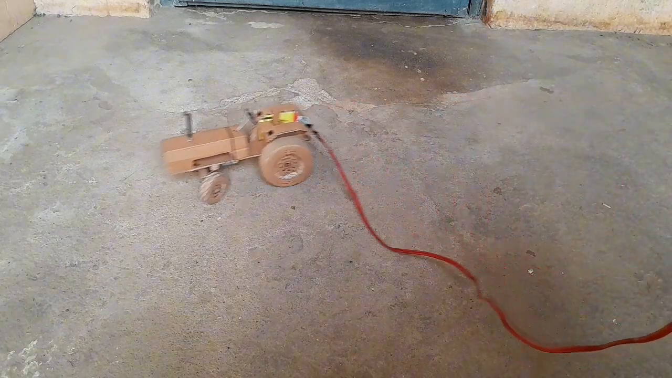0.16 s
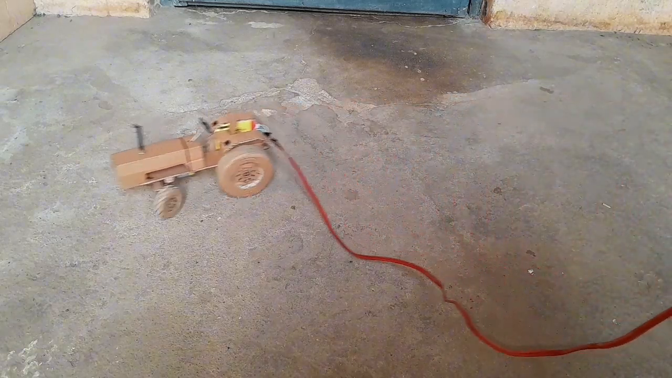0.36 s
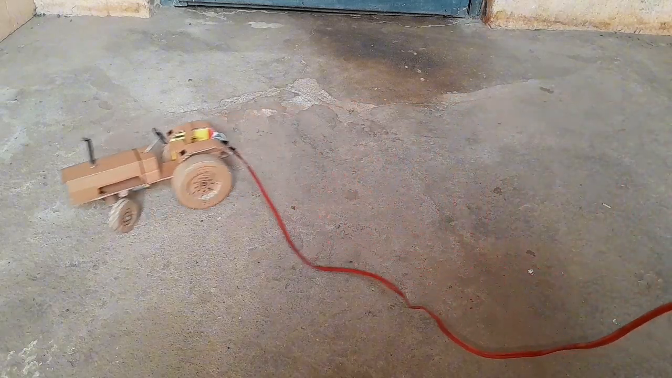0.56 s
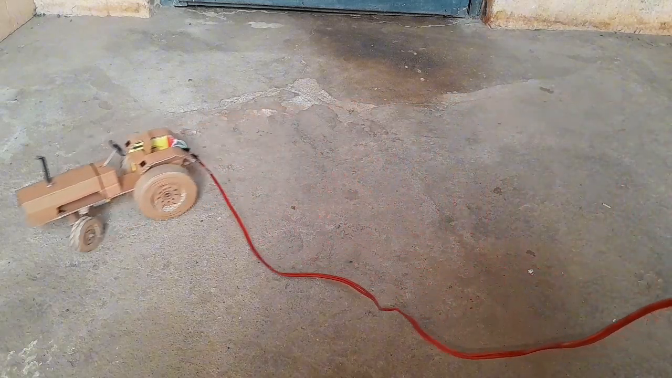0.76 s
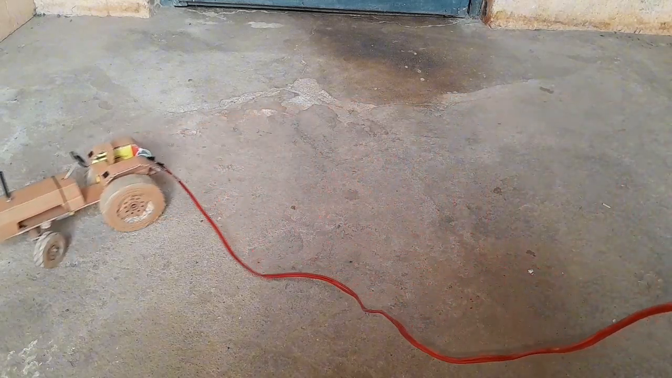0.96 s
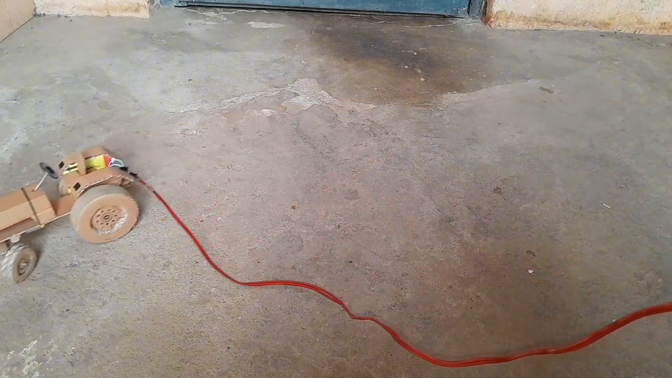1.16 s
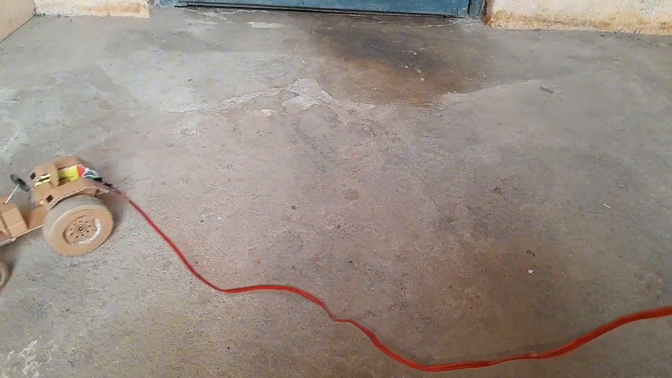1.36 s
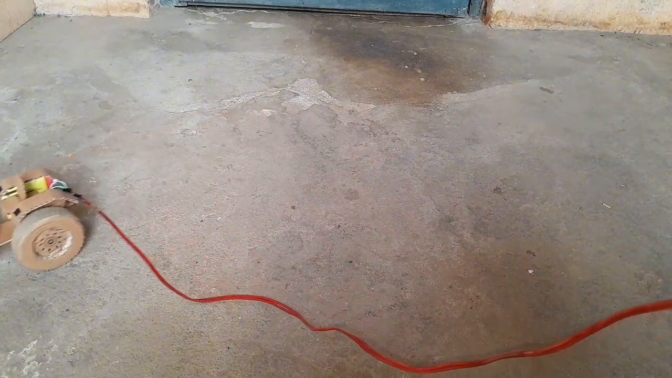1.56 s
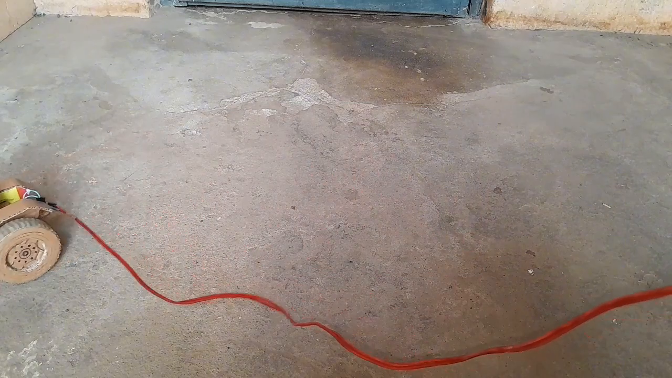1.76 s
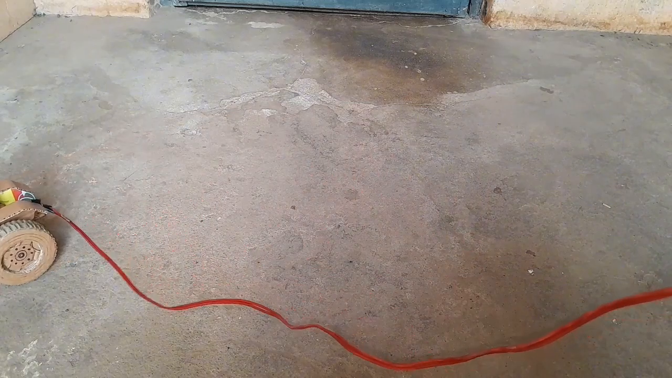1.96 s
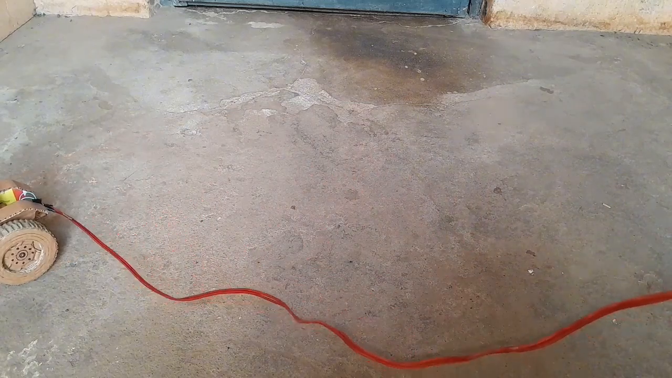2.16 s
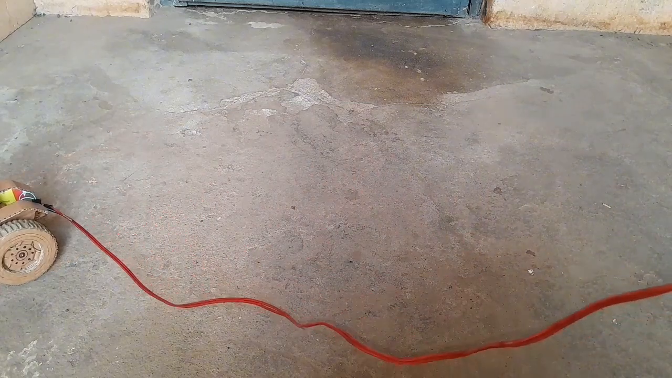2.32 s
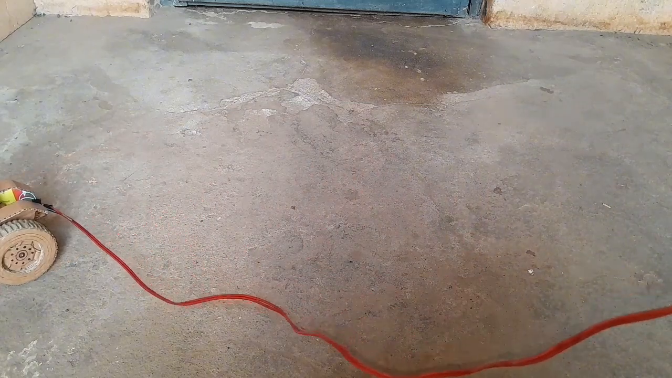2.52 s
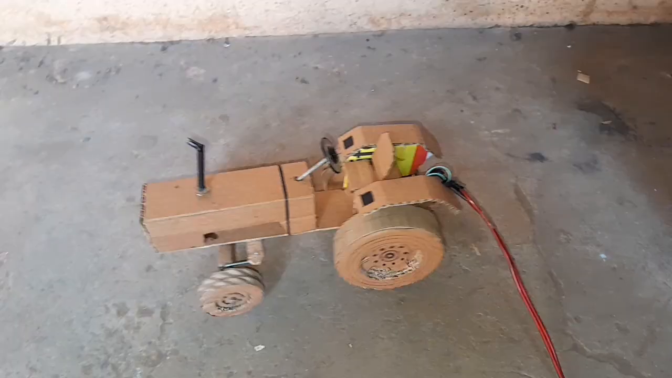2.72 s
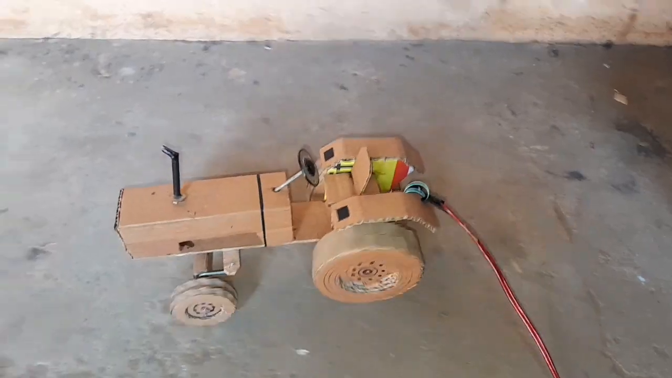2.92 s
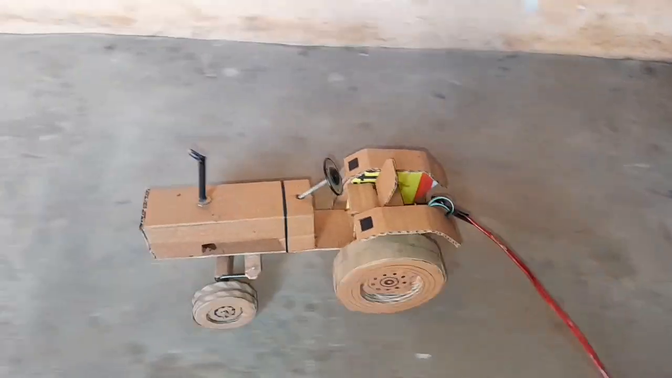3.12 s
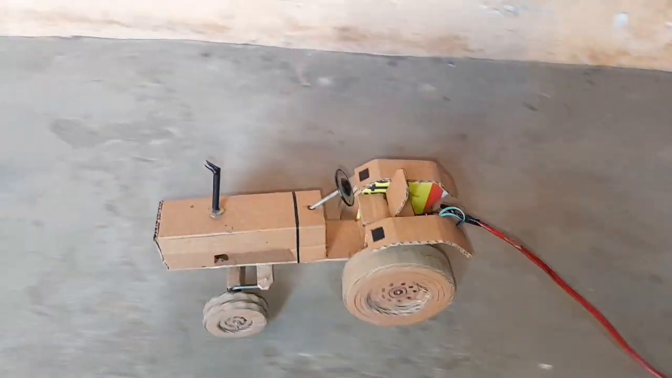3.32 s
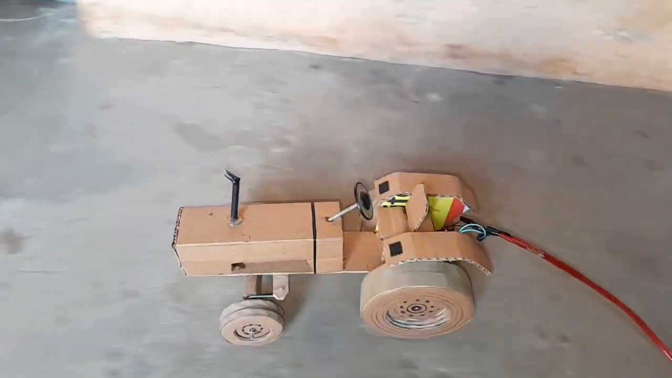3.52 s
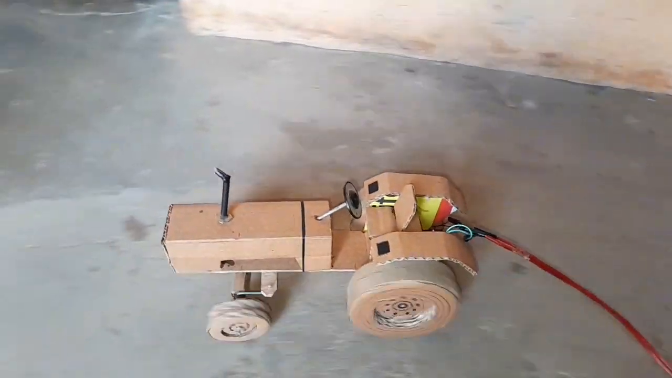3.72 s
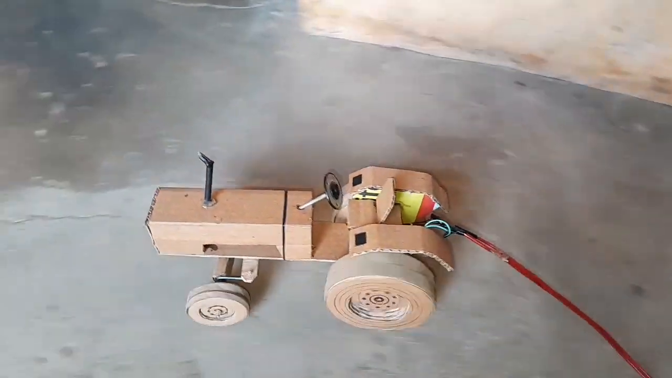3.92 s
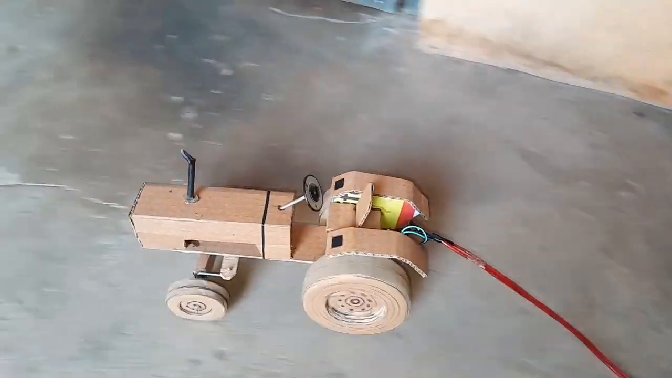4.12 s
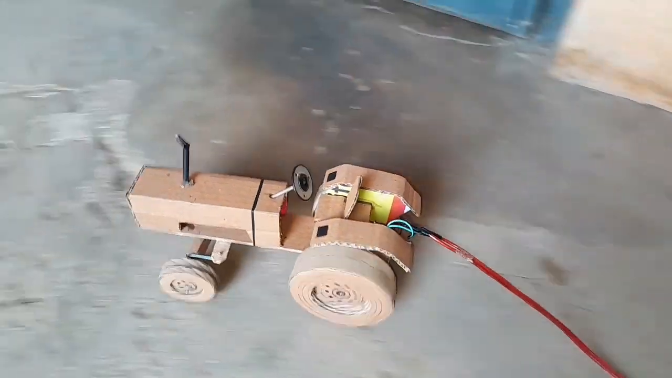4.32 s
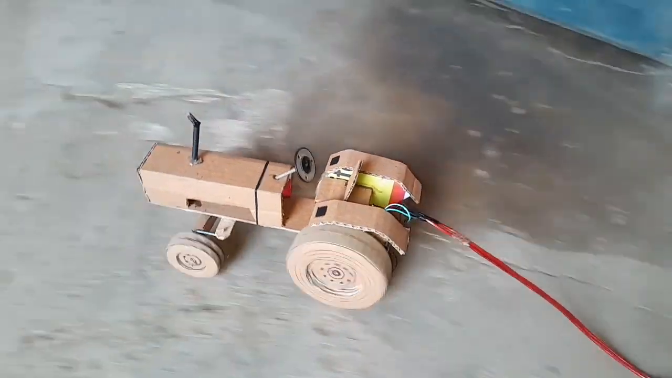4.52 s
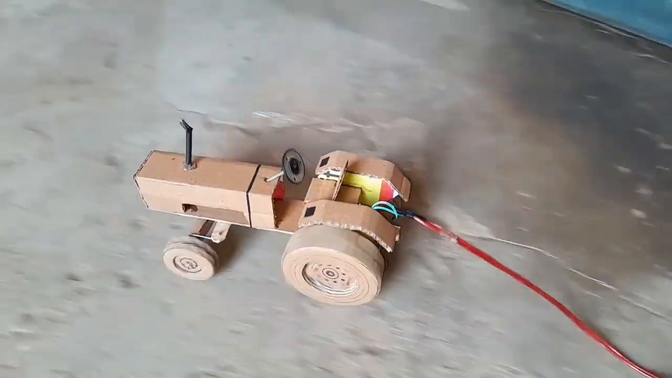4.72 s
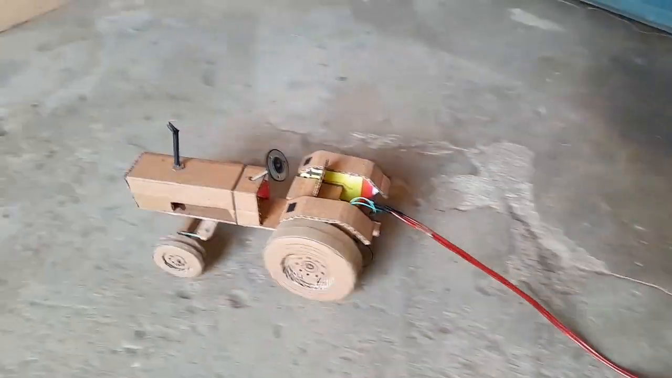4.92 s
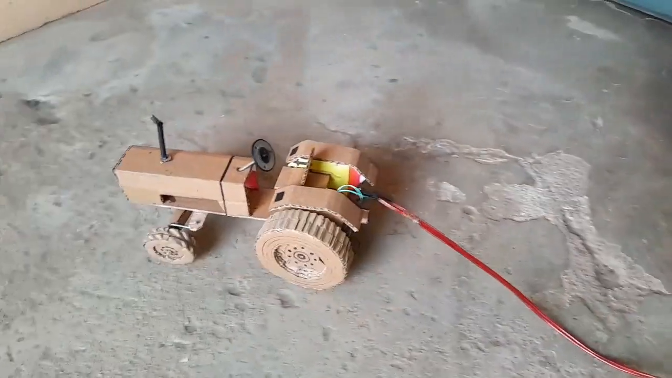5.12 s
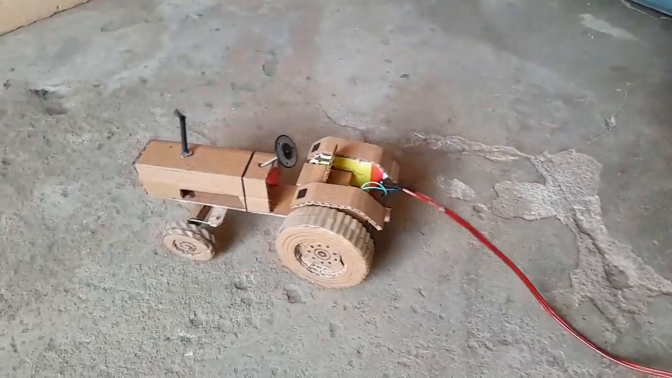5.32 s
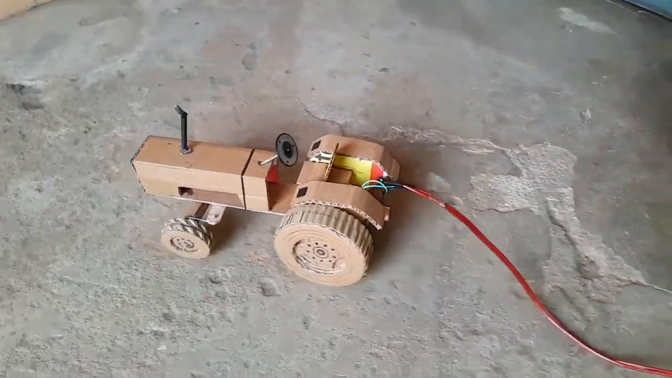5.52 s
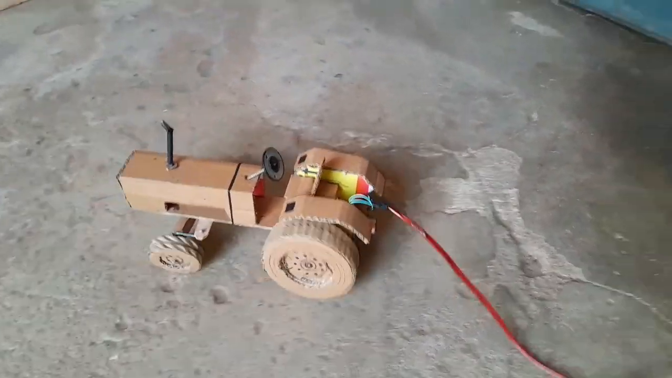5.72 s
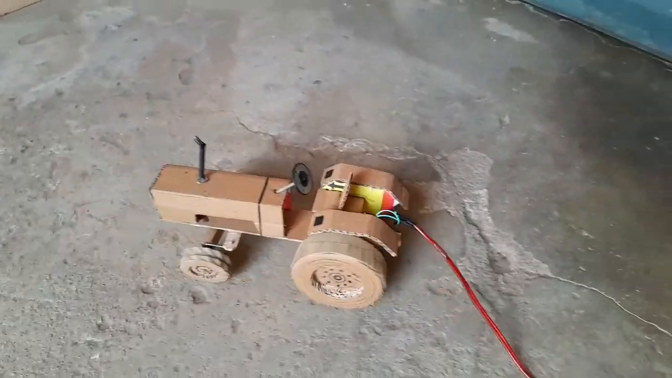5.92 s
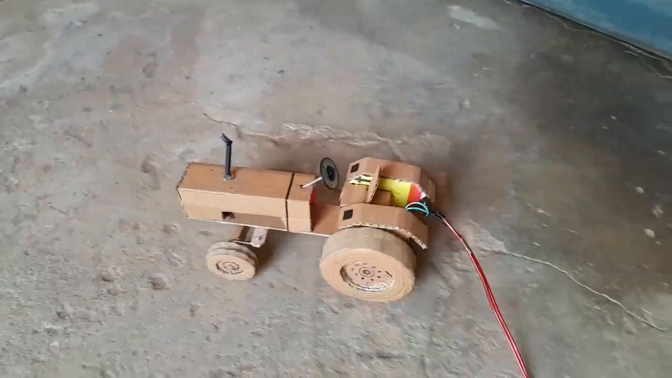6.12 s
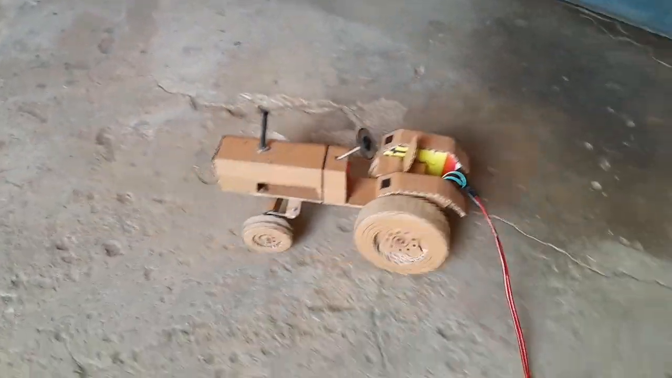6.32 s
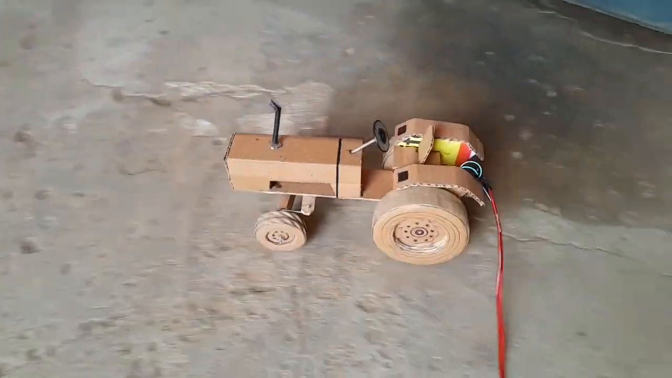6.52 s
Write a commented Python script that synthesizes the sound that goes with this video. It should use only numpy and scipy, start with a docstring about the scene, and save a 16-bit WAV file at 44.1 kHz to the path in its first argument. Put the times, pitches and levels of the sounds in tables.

```python
"""A cardboard toy tractor on a cable drives over rough concrete, far off, then after a short mute close by.
Random grit contacts and rattling gears ring the hollow box; fine grit gives the treble.
Knocks are decaying sines, the cable snags as ticks with scraping noise, the gears whine as a rough tone.
Behind lie a bird, late in the far pass, as a gliding near-sine in a cloud of echoes, a rumble and air of
coloured noise, and during the far pass an engine hum of harmonics."""
import sys
import numpy as np
from scipy import signal
from scipy.fft import rfft, irfft, next_fast_len
from scipy.io import wavfile

SR = 44100
rng = np.random.default_rng(int(sys.argv[2]) if len(sys.argv) > 2 else 0)


def wav_out(sig):
    """Save sig, one row per channel (or a flat mono array), as 16-bit PCM at SR to the path in sys.argv[1]."""
    wavfile.write(sys.argv[1], SR, np.round(np.clip(np.atleast_2d(sig).T, -1, 1) * 32767).astype(np.int16))


N = 294147
LATE_FAR_START_S, NEAR_START_S = 1.2, 2.76
LAG_FAR_MS, LAG_NEAR_MS = 0.29, 0.11   # the right port hears the toy this much later
SHAKE_DB = -3.5   # how hard a knock shakes the whole box, relative to its ring


def tractor(levels, body, broad, treble, ports, hiss_db, peak_db, rattle_db, clump_db):
    """Grit and rattle shake the box through its modes; finer grit gives the treble."""
    body_db, grit_db = levels
    clumps = amp(clump_db * (drift(25.16) + .5 * drift(110)))
    _, knock_db, _, treble_db = np.transpose(KNOCKS)

    shake = grit(per_s=4400, size_db=2.5, smooth=0.77)
    shake = shake + amp(peak_db) * resonate(shake, body)
    loose_parts = amp(rattle_db) * rattle(per_s=250, cycles=8.5, count=12)
    box = unit(spread(*(shake + loose_parts), broad, *ports))
    knock_shake = knock_envelope(knock_db + SHAKE_DB, t60=0.17)
    out = box * np.hypot(amp(body_db) * clumps, knock_shake)

    fine_grit = shake + grit(per_s=6200, size_db=3.5, smooth=0.35)
    fine = spread(*fine_grit, treble, *ports)
    tick = knock_envelope(knock_db + treble_db, t60=0.1)
    # stones snapping under a wheel sound in all the treble
    snaps = jolts(per_s=5.9, size_db=-5.0, t60=0.023)
    treble_pairs = [(0, (2600, 4600, 8000), 1.0), (hiss_db, (8000, 11500, 17000), .4)]
    for above_db, edges_hz, tick_share in treble_pairs:
        patches = []
        for low_hz, high_hz in zip(edges_hz, edges_hz[1:]):
            # lighter snaps and flicker stay inside one band
            flicker = amp(1.7 * drift(23))
            light_snaps = jolts(per_s=19, size_db=4.5, t60=0.023)
            patches.append(band(fine, low_hz, high_hz) * flicker * light_snaps)
        bed = amp(grit_db + above_db) * clumps * snaps
        out += unit(patches[0] - patches[1]) * np.hypot(bed, tick_share * tick)
    return out


def grit(per_s, size_db, smooth):
    """Contacts at random with uneven sizes over a smooth noise bed, twice over."""
    size = amp(size_db * np.minimum(rng.exponential(1, (2, N)), 4))
    signed = size * rng.choice([-1, 1], (2, N))
    contacts = signed * (rng.random((2, N)) < per_s / SR)
    return unit(contacts) + smooth * rng.standard_normal((2, N))


def rattle(per_s, cycles, count):
    """Loose parts: sparse clicks dealt to short rings spread over two octaves, twice over."""
    clicks = grit(per_s, size_db=1.0, smooth=0)
    dealt = rng.integers(0, count, N)
    rings = 0
    for k, hz in enumerate(np.geomspace(600, 2600, count)):
        rings = rings + resonate(clicks * (dealt == k) + 1e-18, [(hz, hz / cycles, 0)])
    return unit(rings)


def jolts(per_s, size_db, t60):
    """Random bumps: a gain that jumps up at once and dies away."""
    size = amp(size_db * np.minimum(rng.exponential(1, N), 4))
    hits = (rng.random(N) < per_s / SR) * size
    return unit(1 + signal.lfilter([1], [1, -amp(-60 / (t60 * SR))], hits))


# far pass, the toy moves in lurches: start_s, length_s, start_db and end_db [body level],
# grit_db [above body]
LURCHES = [(0, 0.084, -30.5, -43.5, -16), (0.057, 0.075, -30, -35.5, -9.5), (0.168, .21, -31.5, -32, -14.5),
           (.4, 0.13, -41.5, -46, -10), (0.582, 0.12, -33.5, -31.5, -11.5), (0.682, 0.29, -30, -33, -11.5),
           (1.023, 0.024, -42, -30, -9.5), (1.099, 0.33, -34.5, -33.5, -13), (1.211, 0.27, -26, -21, -8),
           (1.6, 0.52, -47.5, -70, -9), (1.819, 0.051, -30.5, -25, -14.5)]
LURCH_ATTACK_S, LURCH_FADE_DB_PER_S = 0.0062, 256
ECHO_DB, ECHO_FADE_DB_PER_S = -25, 125   # the yard's walls answer each lurch


def lurches():
    """Body and grit level of the far pass in dB: each lurch plus a quieter, slower-fading echo level."""
    rows = np.array(LURCHES)
    levels = []
    for above_db in (0 * rows[:, 4:], rows[:, 4:]):
        shape = np.hstack([rows[:, :2], rows[:, 2:4] + above_db])
        direct = bursts(shape, LURCH_ATTACK_S, LURCH_FADE_DB_PER_S)
        echo = bursts(shape, LURCH_ATTACK_S, ECHO_FADE_DB_PER_S) + ECHO_DB
        levels.append(20 * np.log10(np.hypot(amp(direct), amp(echo))))
    return levels


# modes of the cardboard box and gear housing: pitch_hz, width_hz, level_db [relative]
BODY_FAR = [(782, 3.5, 15), (1052, 14, 5), (1450, 22, 1.5), (1520, 68, 1), (1630, 13, -2.5), (2070, 13, -9),
            (3440, 15, 4), (4920, 39, 5.5)]
# body between its peaks: pitch_hz, level_db [per Hz, relative]
BROAD_FAR = [(120, -50), (200, -9), (708, -4), (777, -9.5), (843, -6.5), (1440, 5), (3200, -11.5),
             (4160, -80), (7040, -120)]
# grit and hiss: pitch_hz, level_db [per Hz, relative]
TREBLE_FAR = [(1530, -23), (2600, -10), (3590, -1), (3940, 0.5), (5310, -3.5), (7390, -3), (8620, -11.5),
              (11800, -10.5), (15300, -12.5), (16300, -40.5)]
# stereo match: pitch_hz, likeness [1 = both ports alike, 0 = unrelated]
LIKENESS_FAR = [(60, 0.83), (300, 1), (1000, 0.3), (3000, 0.22), (15000, .5)]
# stereo tilt: pitch_hz, left_above_right_db
LEFT_FAR = [(60, 1), (180, 2), (550, 0.5), (1650, 0.5), (4970, 2.5), (15000, 2.5)]


def far_tractor(levels):
    """The distant toy, its box ringing in narrow modes."""
    ports = (LIKENESS_FAR, LEFT_FAR, LAG_FAR_MS)
    return tractor(levels, BODY_FAR, BROAD_FAR, TREBLE_FAR, ports,
                   hiss_db=-4.5, peak_db=6.5, rattle_db=-11.5, clump_db=1.37)


# box modes late in the far pass: pitch_hz, width_hz, level_db [relative]
BODY_LATE_FAR = [(1086, 16, 1), (1393, 44, 5), (1515, 40, -3), (2055, 47, 7), (2370, 76, -5.5),
                 (3570, 49, -2.5), (3950, 160, -8)]
# body between those peaks: pitch_hz, level_db [per Hz, relative]
BROAD_LATE_FAR = [(120, -54), (200, -24), (411, -18.5), (609, -8.5), (914, -12), (1560, -2), (3200, -13.5),
                  (4160, -39), (7040, -120)]


def late_far_tractor(levels):
    """The distant toy later on, the box speaking through another set of modes."""
    ports = (LIKENESS_FAR, LEFT_FAR, LAG_FAR_MS)
    return tractor(levels, BODY_LATE_FAR, BROAD_LATE_FAR, TREBLE_FAR, ports,
                   hiss_db=-6, peak_db=6, rattle_db=-8, clump_db=-1.5)


# near pass, rolling with one stop: time_s, body_db, grit_db
ROLL_NEAR = [(2.78, -66, -63.5), (2.89, -49.5, -53), (3.01, -56.5, -64.5), (3.06, -44.5, -55.5),
             (3.22, -48, -58.5), (3.91, -45, -54), (4.25, -41.5, -52.5), (4.69, -39, -50),
             (4.98, -45, -58.5), (5.11, -53, -51), (5.22, -72.5, -76), (5.45, -83, -95), (5.49, -69, -69.5),
             (5.74, -65, -71), (6.04, -53.5, -56.5), (6.15, -56.5, -63), (6.2, -53.5, -61.5),
             (6.67, -44, -56)]
# box modes heard close by: pitch_hz, width_hz, level_db [relative]
BODY_NEAR = [(560, 27, -42), (819, 29, 5), (1106, 170, -32), (1250, 20, 1), (1390, 130, -37),
             (1900, 43, 1.5)]
# body between those peaks: pitch_hz, level_db [per Hz, relative]
BROAD_NEAR = [(120, 0), (200, -3.5), (623, -0.5), (700, -5.5), (1250, 0.5), (1830, -1), (3200, -10.5),
              (4160, -30), (7040, -120)]
# close grit and hiss: pitch_hz, level_db [per Hz, relative]
TREBLE_NEAR = [(1530, -60), (2600, -23), (3350, -11.5), (7390, -11), (8950, -11), (14000, -6),
               (15400, -10.5), (16300, -6)]
# stereo match, also of the yard: pitch_hz, likeness [1 = both ports alike, 0 = unrelated]
LIKENESS_NEAR = [(60, 0.97), (300, 0.52), (1000, 0.69), (3000, 0.13), (15000, 0.1)]
# stereo tilt, also of the yard: pitch_hz, left_above_right_db
LEFT_NEAR = [(60, 3), (240, -0.5), (950, 2), (3770, 0.5), (15000, 1)]


def near_tractor():
    """The toy close by, its rolling level drawn as a continuous curve."""
    ports = (LIKENESS_NEAR, LEFT_NEAR, LAG_NEAR_MS)
    return tractor(curves(ROLL_NEAR), BODY_NEAR, BROAD_NEAR, TREBLE_NEAR, ports,
                   hiss_db=-1.0, peak_db=6, rattle_db=-9.5, clump_db=1.76)


# knocks of wheels and gears: start_s, level_db [ring at its start], pitch_hz [ring],
# treble_db [above level_db]
KNOCKS = [(0.068, -31.5, 1490, -7), (0.116, -38, 1630, -18), (0.176, -49, 1590, -14),
          (0.294, -28, 1520, -29), (0.343, -35, 1460, -11), (0.448, -28, 1520, -31),
          (0.55, -31.5, 1500, -10.5), (0.594, -47, 1450, -10), (0.839, -39, 1450, 2.5),
          (0.956, -25.5, 1450, -11), (1.036, -29, 1510, -2), (1.219, -31, 1440, -20),
          (1.342, -18, 1485, -13.5), (1.437, -30, 1430, -10), (1.477, -36, 1520, 6),
          (1.829, -34.5, 2280, -2), (2.886, -44.5, 1315, -11), (2.971, -43, 1430, -22),
          (3.15, -39.5, 1270, -27), (3.215, -39.5, 820, -30), (3.242, -41, 1420, -12),
          (3.307, -35.5, 1300, -11), (3.381, -42, 1240, -8), (3.545, -38.5, 1280, -29),
          (3.66, -34, 1296, -24), (3.787, -39, 1270, -20), (3.827, -34.5, 1383, -8.5),
          (4.048, -33.5, 2064, -9), (4.234, -41, 1850, -7), (4.253, -31.5, 1900, -10),
          (4.409, -37.5, 1204, -26), (4.499, -31, 1280, -13), (4.691, -31, 1060, -15),
          (4.78, -34.5, 1513, -11.5), (4.954, -30.5, 1630, -10), (6.168, -43, 1166, -8.5),
          (6.196, -41.5, 1140, -5), (6.238, -41.5, 1170, -19), (6.334, -39, 1075, -11.5),
          (6.378, -38.5, 1540, -11), (6.394, -37, 1450, -9.5), (6.573, -39.5, 1150, -18),
          (6.645, -38, 1260, -19)]


def knock_rings(t60):
    """Each knock sets a panel ringing briefly; the right port hears it late."""
    out, t = np.zeros((2, N + SR)), np.arange(SR // 10) / SR
    for start_s, level_db, hz, _ in KNOCKS:
        lag_s = (LAG_FAR_MS if start_s < NEAR_START_S else LAG_NEAR_MS) / 1000
        tone = amp(level_db - 60 * t / t60) * np.sin(2 * np.pi * hz * t)
        for port, arrival_s in enumerate([start_s, start_s + lag_s]):
            first = round(arrival_s * SR)
            out[port, first:first + len(t)] += tone
    return out[:, :N]


def knock_envelope(db, t60):
    """Each knock starts at once and dies away."""
    hits = np.zeros(N)
    hits[np.round(np.array(KNOCKS)[:, 0] * SR).astype(int)] = amp(db)
    return signal.lfilter([1], [1, -amp(-60 / (t60 * SR))], hits + 1e-18)


# the cable snags and scrapes on the concrete: start_s, level_db [tick at its start], centre_hz,
# width_octaves, scrape_db [above tick]
SNAGS = [(1.6614, -29.5, 4430, 9.9, -14.5), (1.7392, -45, 5270, 1.2, -10), (1.7957, -39.5, 5220, 1.7, -3),
         (3.042, -33.5, 9000, 2, -6.5), (3.173, -45, 10800, 0.87, -9), (3.8074, -38, 7400, 0.97, -17),
         (3.933, -47, 12700, 1.2, -11), (4.1504, -24.5, 8200, 1.2, -17.5), (4.8892, -36.5, 5140, 1.4, -13),
         (4.955, -34.5, 5360, 0.58, -12), (5.0257, -36.5, 11700, 4.8, -7),
         (5.0964, -35.5, 13500, 0.92, 1.5), (5.2327, -64.5, 8000, 1.3, -3), (5.4762, -48, 5350, 1.2, -14),
         (5.525, -54, 10200, 2.9, -5), (5.619, -59, 8120, 0.88, -1), (5.774, -61, 7740, 0.77, 1),
         (5.996, -45, 10900, 2.2, -5), (6.44, -42, 9000, 1.5, -12)]
TICK_T60_S, SCRAPE_T60_S = 0.0073, 0.18


def cable(shared_gain):
    """Each snag is a sharp tick and a band of friction noise that dies away."""
    out, t = np.zeros((2, N + SR)), np.arange(SR // 4) / SR
    noise = rng.standard_normal((len(SNAGS), 3, len(t)))
    for (start_s, level_db, hz, octaves, scrape_db), (shared, *own) in zip(SNAGS, noise):
        half = 2 ** (max(octaves, .2) / 2)
        friction = shared_gain * shared + np.array(own)
        scrape = unit(band(friction, hz / half, min(hz * half, .45 * SR)))
        shape = amp(-60 * t / TICK_T60_S) + amp(scrape_db - 60 * t / SCRAPE_T60_S)
        first = round(start_s * SR)
        out[:, first:first + len(t)] += amp(level_db) * shape * scrape
    return out[:, :N]


# gear whine: time_s, mesh_hz, level_db [above the body]
WHINE = [(.4, 780, -21), (.6, 490, -15.5), (.72, 600, -13), (.85, 574, -20), (.97, 780, -17),
         (1.2, 720, -23), (1.35, 481, -12.5), (1.39, 622, -13), (1.44, 771, -13.5), (1.5, 490, -15)]
WHINE_END_S = 1.6


def gears(body_db):
    """A rough mesh tone with two overtones; pitch and strength shake at random."""
    hz, above_db = curves(WHINE)
    turn = 2 * np.pi * np.cumsum(hz * (1 + 0.02 * drift(60))) / SR
    mesh = np.sin(turn) + 0.56 * np.sin(2 * turn) + 0.21 * np.sin(3 * turn)
    tone = amp(body_db + above_db + 1.9 * drift(50)) * mesh
    return np.array([tone, np.roll(tone, round(LAG_FAR_MS * SR / 1000))])


# the motor strains as the wheels catch or start: start_s, length_s, start_db, end_db
STRAIN = [(1.823, 0.029, -32, -36), (5.47, 0.22, -65, -70.5), (5.78, 0.16, -64, -91)]


def strain():
    """A thin buzz in the gear housing: uneven contacts and noise in one narrow band."""
    buzz = band(grit(per_s=990, size_db=6.5, smooth=.8), 2200, 2800, order=3)
    return unit(buzz) * amp(bursts(STRAIN, LURCH_ATTACK_S, LURCH_FADE_DB_PER_S))


# pitch of the bird's whistle: time_s, pitch_hz
BIRD = [(1.95, 927), (2.01, 1146), (2.11, 1344), (2.17, 1470), (2.28, 1290), (2.33, 1112), (2.46, 1190),
        (2.61, 1157), (2.745, 1328)]
# its notes before the echoes: start_s, length_s, start_db, end_db
NOTES = [(1.94, .17, -49, -55.5), (2.265, 0.085, -54, -53.5), (2.43, 0.22, -74, -76),
         (2.635, 0.13, -53.5, -57)]
NOTE_ATTACK_S, NOTE_FADE_DB_PER_S = .03, 300


def bird():
    """A gliding near-sine, smeared by a decaying cloud of echoes that differs at each ear."""
    (hz,) = curves(BIRD)
    note_db = bursts(NOTES, NOTE_ATTACK_S, NOTE_FADE_DB_PER_S)
    turn = 2 * np.pi * np.cumsum(hz * (1 + 0.009 * drift(40))) / SR
    call = amp(note_db) * amp(2.54 * drift(49)) * np.sin(turn)
    t = np.arange(SR // 3) / SR
    echoes = rng.standard_normal((2, len(t))) * amp(-60 * t / 0.45 - 26.0)
    # the direct call, 14 samples later on the right
    echoes[0, 0], echoes[1, 14] = .7, .6
    far = np.arange(N) < NEAR_START_S * SR
    return signal.fftconvolve(call[None], echoes, axes=1)[:, :N] * far


# swell of the yard rumble: time_s, level_db
RUMBLE = [(0, -47), (.6, -47), (.78, -44), (.95, -53), (1.7, -46), (2.1, -52), (2.18, -62.5), (2.33, -50.5),
          (2.48, -61.5), (2.68, -45.5), (2.8, -60), (2.92, -52.5), (4.15, -52.5), (4.5, -52), (5.08, -51.5),
          (5.2, -59.5), (5.33, -53.5), (5.42, -65), (5.64, -49), (5.72, -60.5), (5.85, -52.5), (5.94, -57),
          (6.3, -53), (6.67, -63)]
# rumble colour: pitch_hz, level_db [per Hz, relative]
RUMBLE_COLOUR = [(13, -31.5), (22, -13), (59, -7), (80, 2), (113, -4), (137, -9.5), (172, -11),
                 (252, -12.5), (300, -16.5), (390, -23.5), (660, -120)]
# walls boom with the rumble: pitch_hz, width_hz, level_db [relative]
YARD_BOOM = [(60.3, 13, 2.5), (79, 11, 9.5), (111.6, 20, -3)]
LUMPS_DB, LUMPS_PER_S = 1.5, 5.6   # the rumble swells and sinks at random
# engine hum: time_s, firing_hz, level_db [before the harmonic and port gains]
HUM = [(0, 29.3, -50), (.8, 30.01, -49), (1.4, 29.38, -54), (2.1, 28.95, -57.5), (2.3, 30, -81),
       (2.74, 29.4, -64.5)]
# hum harmonics: multiple [of firing_hz], level_db [relative]
HUM_ORDERS = [(2, -4.5), (3, -12), (4, -0.5), (5, -1), (6, -6.5), (7, -18.5), (9, -8.5), (12, -6.5)]
# still yard air: pitch_hz, level_db [per Hz, relative]
AIR = [(88, -32), (150, -10.5), (450, -4.5), (558, -4), (1030, -15), (1150, -22.5), (1580, -25.5),
       (13400, -39), (16300, -23)]
AIR_FAR_DB, AIR_NEAR_DB = -64.5, -60.5


def yard():
    """Lumpy rumble, the engine's hum until the near pass, and still air."""
    far = np.arange(N) < NEAR_START_S * SR
    rumble = spread(*rng.standard_normal((2, N)), RUMBLE_COLOUR, LIKENESS_NEAR, LEFT_NEAR)
    rumble = rumble + resonate(rumble, YARD_BOOM)
    rumble_db = curves(RUMBLE)[0] + LUMPS_DB * drift(LUMPS_PER_S)

    firing_hz, hum_db = curves(HUM)
    turn = 2 * np.pi * np.cumsum(firing_hz * (1 + 0.0018 * drift(1))) / SR
    hum = 0
    for multiple, db in HUM_ORDERS:
        phase = rng.uniform(0, 2 * np.pi)
        hum = hum + amp(db + 1.7 * drift(11)) * np.sin(multiple * turn + phase)
    # the hum is 0.7 dB louder at the left port and 0.7 dB quieter at the right
    hum = far * amp(hum_db) * hum * amp(-3.0980392) ** 0 * np.array([[1], [1]]) * amp([[.7], [-.7]])

    air = spread(*rng.standard_normal((2, N)), AIR, LIKENESS_NEAR, LEFT_NEAR)
    air_db = np.where(far, AIR_FAR_DB, AIR_NEAR_DB) + 2.6 * drift(6)
    return unit(rumble) * amp(rumble_db) + hum + unit(air) * amp(air_db)


def amp(db):
    """dB to gain."""
    return 10 ** (np.asarray(db) / 20)


def unit(x):
    """Scale to rms 1."""
    return x / np.sqrt(np.mean(x ** 2) + 1e-20)


def curves(rows):
    """Columns of a table, joined by lines in time."""
    time_s, *columns = np.transpose(rows)
    return [np.interp(np.arange(N) / SR, time_s, c) for c in columns]


def bursts(rows, attack_s, fade_db_per_s):
    """Level in dB of (start, length, dB, dB) rows: quick rise, sloping hold, straight fade."""
    t, power = np.arange(N) / SR, 1e-12
    for start_s, length_s, start_db, end_db in rows:
        hold_db = np.interp(t, [start_s, start_s + length_s], [start_db, end_db])
        db = hold_db - fade_db_per_s * np.maximum(t - start_s - length_s, 0)
        rise = np.clip((t - start_s) / attack_s, 0, 1)
        power = power + (amp(db) * rise) ** 2
    return 10 * np.log10(power)


def at_hz(points, n=N):
    """A table read on the FFT grid, log frequency."""
    hz = np.maximum(np.fft.rfftfreq(n, 1 / SR), 1)
    return np.interp(np.log(hz), np.log(np.array(points)[:, 0]), np.array(points)[:, 1])


def drift(rate_hz):
    """Slow random wander of rms 1: noise through a two-pole low-pass."""
    r = np.exp(-2 * np.pi * rate_hz / SR)
    return unit(signal.lfilter([1], [1, -2 * r, r * r], rng.standard_normal(N + SR))[SR:])


def band(x, low_hz, high_hz, order=2):
    """Butterworth band-pass."""
    return signal.sosfilt(signal.butter(order, [low_hz, high_hz], "band", fs=SR, output="sos"), x)


def resonate(x, modes):
    """Parallel resonances of (Hz, width, dB), signs alternating."""
    out = 0
    for k, (hz, width_hz, db) in enumerate(modes):
        r = np.exp(-np.pi * width_hz / SR)
        b = (1 - r * r) / 2 * np.array([1, 0, -1])
        ring = signal.lfilter(b, [1, -2 * r * np.cos(2 * np.pi * hz / SR), r * r], x)
        out = out + (-1) ** k * amp(db) * ring
    return out


def spread(mid, side, colour, likeness, left, lag_ms=0):
    """Two signals coloured and mixed into a left-right pair, the right one late."""
    n = next_fast_len(N)
    alike = np.clip(at_hz(likeness, n), -1, 1)
    tilt = amp(at_hz(left, n) / 2)
    m, s = rfft(mid, n) * np.sqrt(1 + alike), rfft(side, n) * np.sqrt(1 - alike)
    late = np.exp(-2j * np.pi * np.fft.rfftfreq(n, 1000 / SR) * lag_ms)   # grid in kHz
    pair = np.array([(m + s) * tilt, (m - s) / tilt * late])
    return irfft(pair * amp(at_hz(colour, n)), n)[:, :N]


def scene():
    """The toy's three stretches in turn, with whine, knocks, cable, strain, bird and yard."""
    t, lurching = np.arange(N) / SR, lurches()
    far, late_far, near = far_tractor(lurching), late_far_tractor(lurching), near_tractor()
    toy = np.where(t < LATE_FAR_START_S, far, np.where(t < NEAR_START_S, late_far, near))
    toy = toy + (t < WHINE_END_S) * gears(lurching[0])
    return toy + knock_rings(t60=0.065) + cable(shared_gain=0.23) + strain() + bird() + yard()


MUTE_START_S, MUTE_END_S = 2.744, 2.778
MUTE_DB, FADE_OUT_S, FADE_IN_S = -36, .008, .01
CUTOFF_HZ = 15950


def record(dry):
    """A short mute between the two passes, then a steep low-pass cuts the top."""
    times = [MUTE_START_S - FADE_OUT_S, MUTE_START_S, MUTE_END_S, MUTE_END_S + FADE_IN_S]
    mute_db = np.interp(np.arange(N) / SR, times, [0, MUTE_DB, MUTE_DB, 0])
    low_pass = signal.ellip(12, .5, 65, CUTOFF_HZ, fs=SR, output="sos")
    return signal.sosfilt(low_pass, dry * amp(mute_db))


dry = scene()
out = record(dry)
wav_out(out)
```